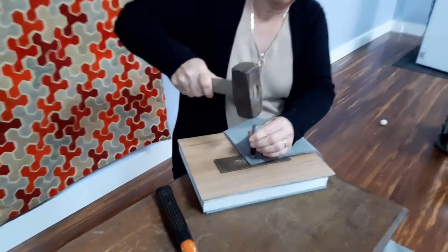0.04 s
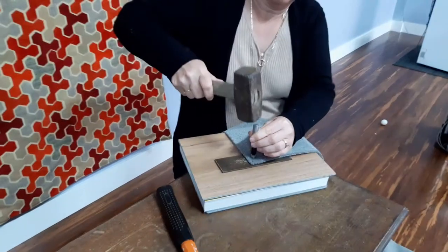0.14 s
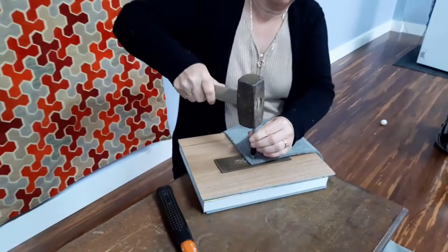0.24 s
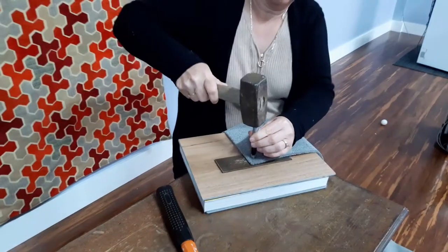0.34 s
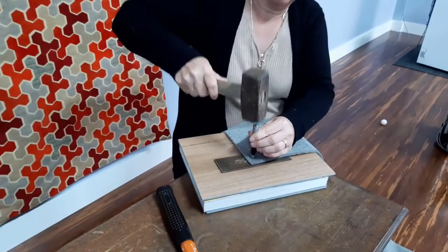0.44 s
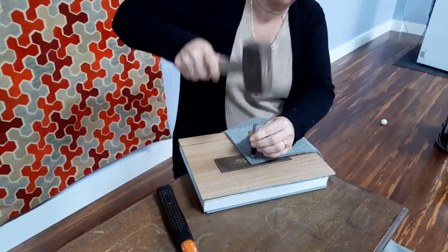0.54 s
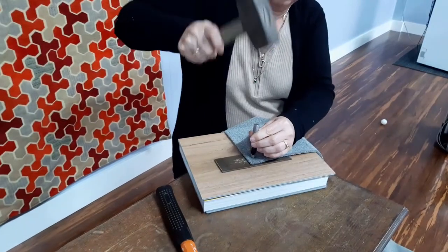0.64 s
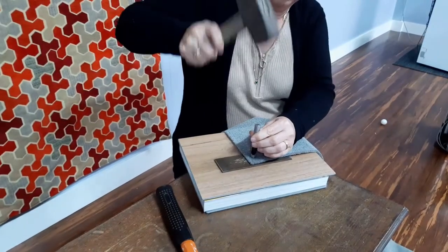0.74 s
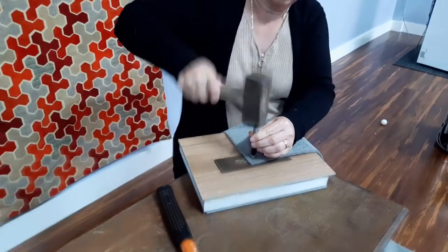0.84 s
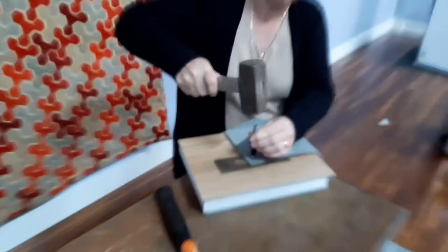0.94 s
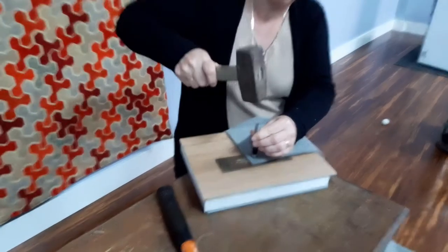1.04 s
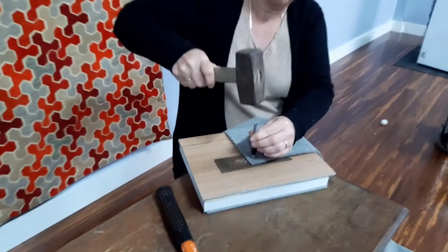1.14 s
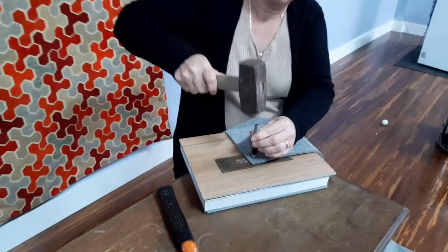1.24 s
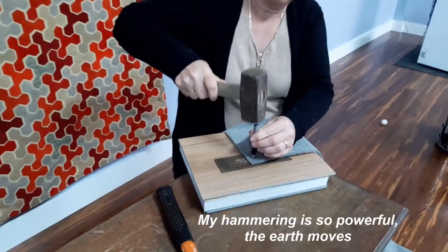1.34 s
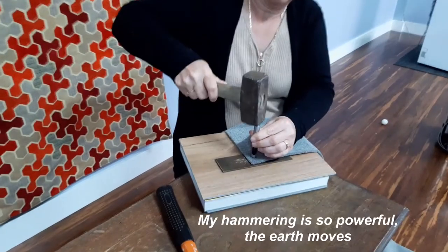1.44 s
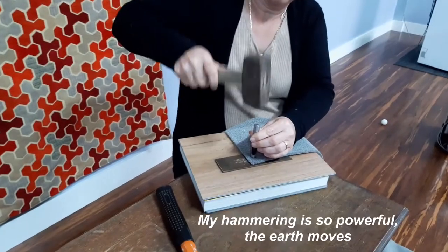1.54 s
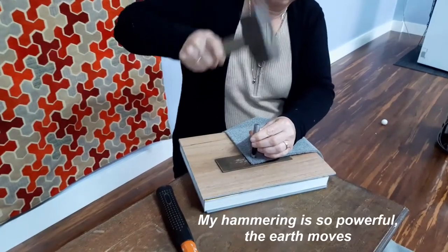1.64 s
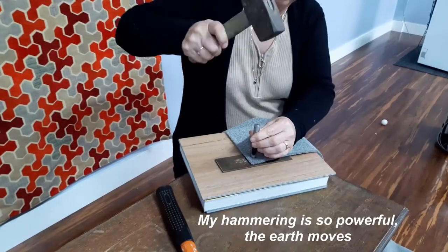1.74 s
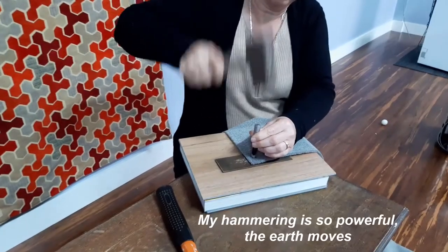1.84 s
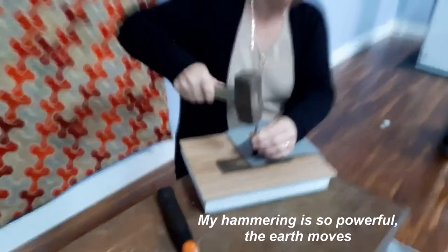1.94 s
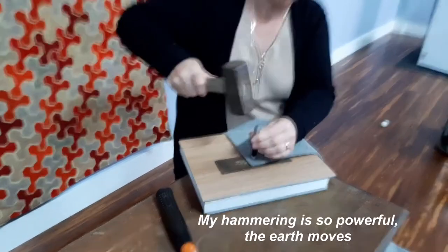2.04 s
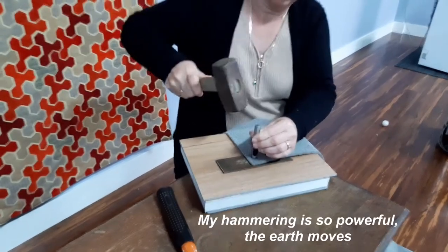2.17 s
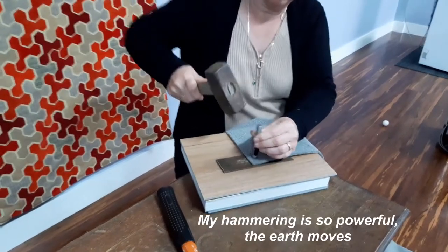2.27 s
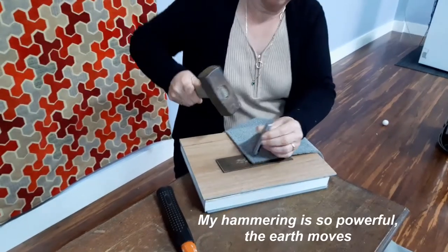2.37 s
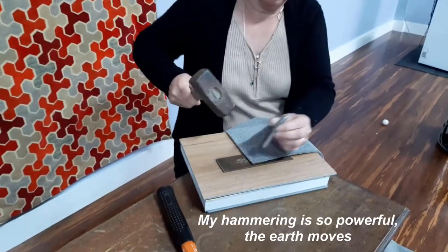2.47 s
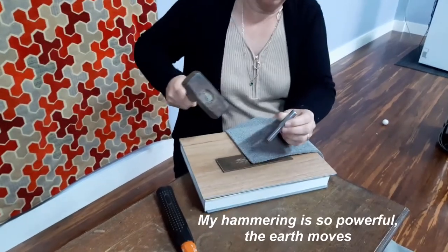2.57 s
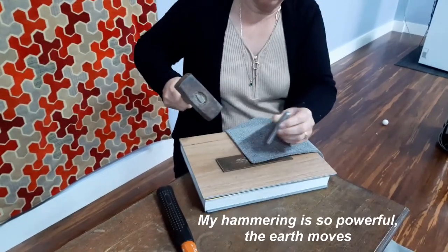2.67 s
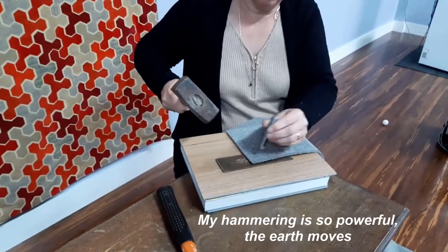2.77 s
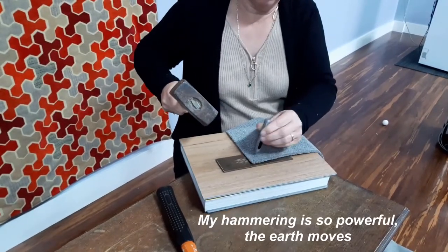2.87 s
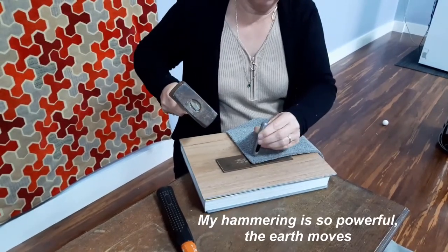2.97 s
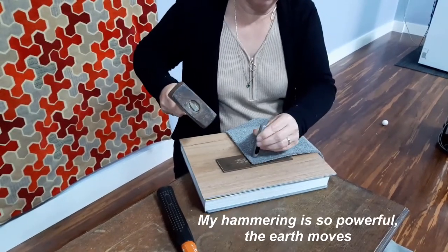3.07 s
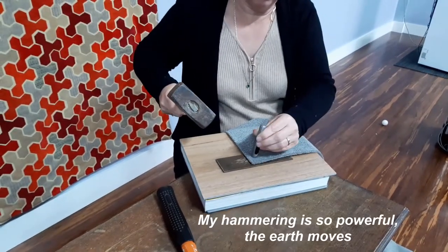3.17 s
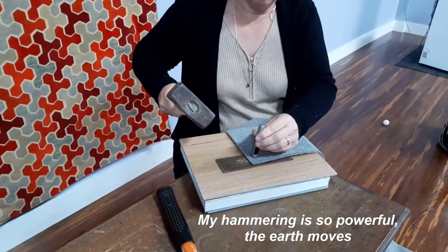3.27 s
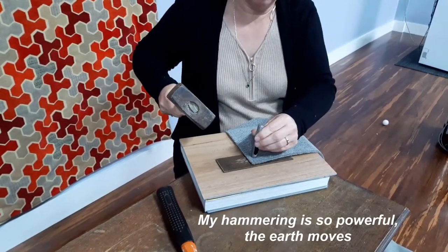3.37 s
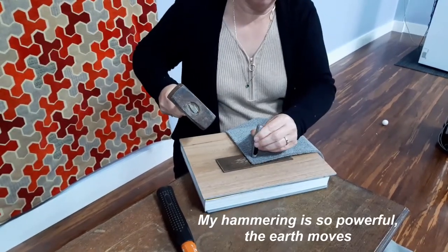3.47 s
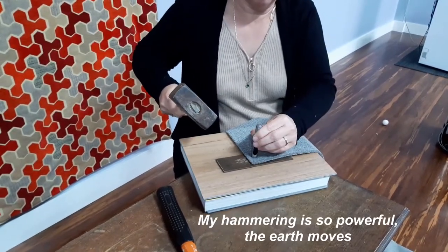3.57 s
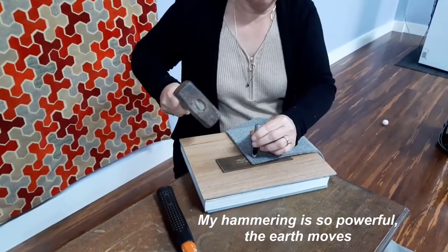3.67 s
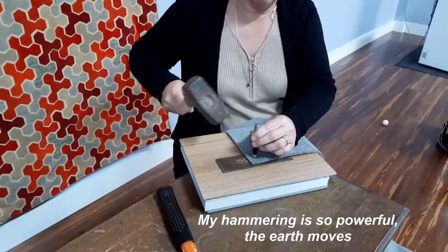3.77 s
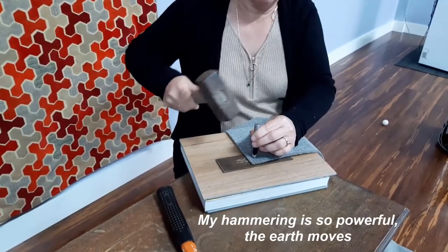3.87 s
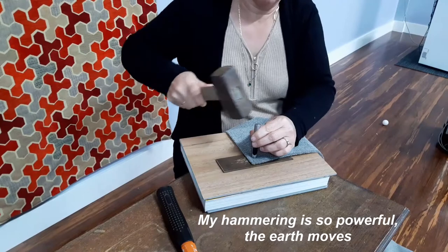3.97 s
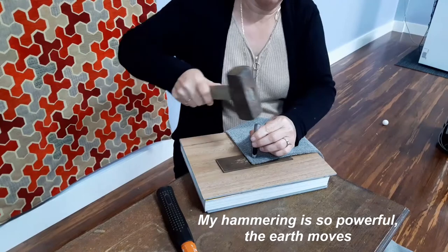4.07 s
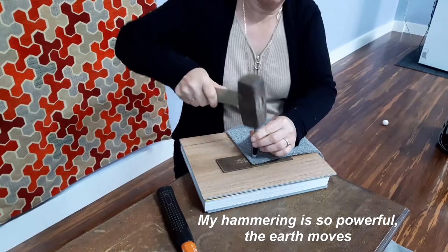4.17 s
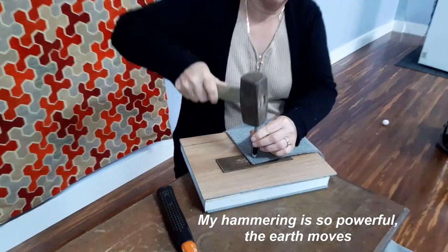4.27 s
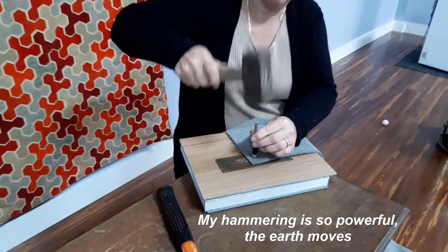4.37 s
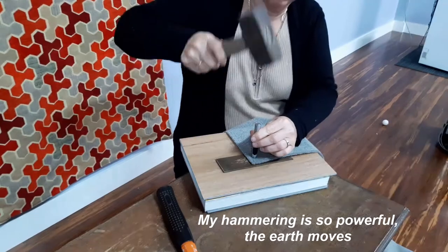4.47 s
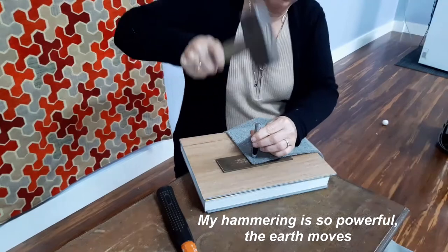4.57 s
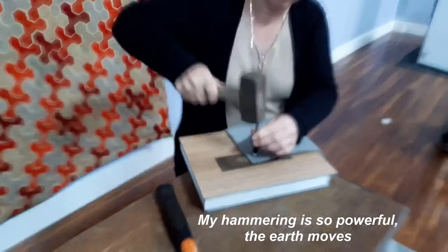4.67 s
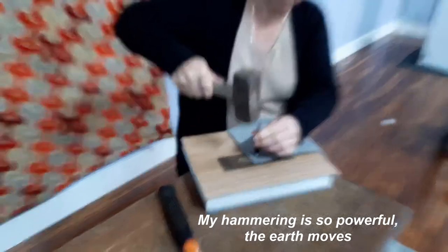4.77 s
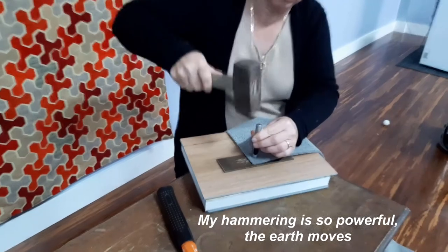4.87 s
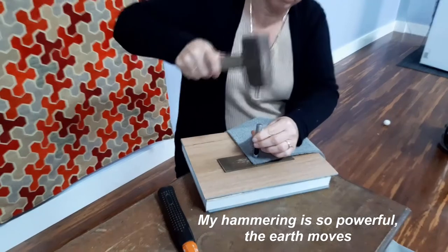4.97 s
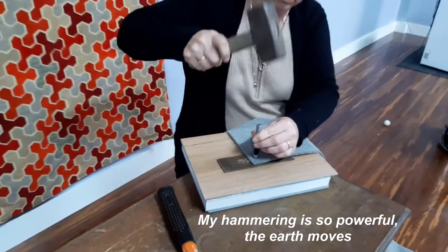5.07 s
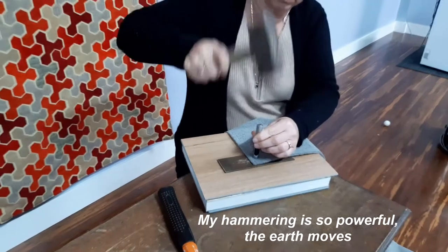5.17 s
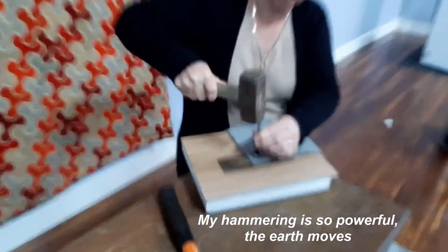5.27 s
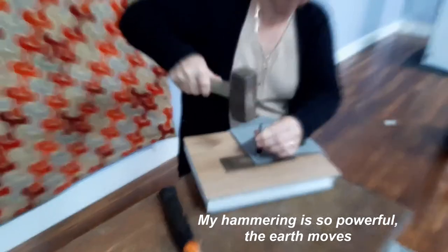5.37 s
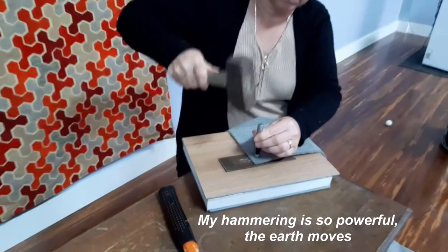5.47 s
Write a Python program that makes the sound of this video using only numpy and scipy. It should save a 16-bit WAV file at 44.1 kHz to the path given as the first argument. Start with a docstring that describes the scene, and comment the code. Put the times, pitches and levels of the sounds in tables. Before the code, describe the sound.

A heavy hammer drives a steel punch into fabric on a book on a desk. Two hard blows, each after a light aiming tap, land with a deep thud, a sharp crack and a thin, high ring. After a pause of about two seconds come a firmer tap and two more blows in quick succession. The microphone is near the desk, and the room's reverberation swells behind each hit.

```python
"""Hole punch and hammer on a desk

A heavy hammer drives a steel punch through thick fabric into a book, in a reverberant room.
Light aiming taps alternate with full blows: the desk thuds, the steel cracks and sings a thin high note.
The stereo microphone hears the desk directly, a little to the left; then the room swells up behind it.
Rumble, drone and hiss lie far below the blows, whose first peaks the recorder's fast limiter flattens."""
import sys
import numpy as np
from scipy import signal
from scipy.fft import rfft, irfft, next_fast_len
from scipy.io import wavfile
from scipy.ndimage import uniform_filter1d, minimum_filter1d

SR = 44100
rng = np.random.default_rng(int(sys.argv[2]) if len(sys.argv) > 2 else 0)


def int16_out(signal):
    """Quantize to a 16-bit WAV file."""
    q = np.round(np.clip(np.atleast_2d(signal).T, -1, 1) * 32767)
    wavfile.write(sys.argv[1], SR, q.astype(np.int16))


N = 243431

# resonances of desk, book and tools: (frequency [Hz], width [Hz], level [dB])
DESK_MODES = [(62, 25, 6.5), (105, 13, 12.5), (223, 61, 7.5), (287, 24, 11.5), (410, 32, -10),
              (552.4, 50, 4.5), (817, 32, -2), (1410, 120, -1.5), (2047, 88, 5), (5560, 320, 0.5),
              (6850, 120, -4)]
# the crack at the microphone, direct and off near surfaces: (delay [s], relative level [dB])
CRACK_ARRIVALS = [(0, 6.5), (0.002, 2), (0.012, -11)]


def amp(db):
    """Decibels to gain."""
    return 10 ** (np.asarray(db) / 20)


def unit(x):
    """Scaled to rms 1."""
    return x / np.sqrt(np.mean(x ** 2) + 1e-20)


def unit_energy(x):
    """Scaled to a mean energy of 1 per channel."""
    return unit(x) / np.sqrt(x.shape[-1])


def along(points, hz):
    """A curve through (frequency, value) points on a log frequency axis."""
    freqs, values = np.transpose(points)
    return np.interp(np.log(hz + 1), np.log(freqs + 1), values)


def filtered(x, response):
    """x through a zero-phase filter of gain response(hz)."""
    n = x.shape[-1]
    padded = next_fast_len(n + 8192)
    return irfft(rfft(x, padded) * response(np.fft.rfftfreq(padded, 1 / SR)), padded)[..., :n]


def minimum_phase(response, size=16384):
    """The minimum-phase impulse response of a gain curve."""
    cepstrum = irfft(np.log(response(np.fft.rfftfreq(size, 1 / SR)) + 1e-6))
    cepstrum[1:size // 2] *= 2
    cepstrum[size // 2 + 1:] = 0
    return irfft(np.exp(rfft(cepstrum)))[:size // 2]


def panned(x, left_db):
    """Louder in the left microphone by left_db."""
    return x * amp([[left_db / 2], [-left_db / 2]])


def diffuse(n):
    """Noise from all around: most alike at the two microphones in the upper bass, unrelated in the treble."""
    # (frequency [Hz], left-right correlation [-1..1])
    likeness = [(30, 0.45), (60, 0.14), (130, 0.95), (300, 0.93), (640, 0.31), (1300, 0), (15000, 0.0042)]
    angle = lambda hz: np.arccos(np.clip(along(likeness, hz), -1, 1)) / 2
    weights = lambda hz: np.array([np.cos(angle(hz)), np.sin(angle(hz))])
    mid, side = filtered(rng.standard_normal((2, n)), weights)
    return np.array([mid + side, mid - side])


def swell(rest_db, peak_s, peak_db, rise_db_per_s, fall_db_per_s):
    """A resting gain joined by one swell that rises and falls evenly in dB."""
    t = np.arange(N) / SR - peak_s
    return np.hypot(amp(rest_db), amp(peak_db + np.minimum(rise_db_per_s * t, -fall_db_per_s * t)))


def room_tone():
    """Low rumble, a dull drone and a faint whining hiss swell once, starting in the hammer's pause."""
    # spectra of the three noises: (frequency [Hz], relative density [dB])
    rumble = [(20, -6.5), (33, -8), (48, -0.5), (65, 1), (88, 6.5), (130, -2.5), (220, -20), (1000, -72)]
    drone = [(29, -34), (50, -10.5), (93, -14), (225, -11), (300, -6), (350, -14), (495, -16), (780, -16.5),
             (1600, -43.5), (2500, -37.5), (3090, -53), (4120, -45.5), (5000, -67.5), (6500, -86),
             (11000, -120)]
    hiss = [(300, 4), (1700, 0), (3000, 8.5), (5500, -0.5), (9000, -3.5), (13000, 2.5), (16000, 6.5)]
    # tones of the whine: (frequency [Hz], level against the hiss [dB])
    whine_tones = [(2460, -6), (2509, -14), (4032, -11)]
    t = np.arange(N) / SR
    rumble_gain = swell(rest_db=-69.5, peak_s=4.45, peak_db=-52, rise_db_per_s=20, fall_db_per_s=20)
    drone_gain = swell(rest_db=-70.5, peak_s=4.17, peak_db=-53, rise_db_per_s=13.5, fall_db_per_s=30.5)
    noise = lambda spectrum: unit(filtered(diffuse(N), lambda hz: amp(along(spectrum, hz))))
    whine = sum(amp(db) * unit(np.sin(2 * np.pi * hz * t)) for hz, db in whine_tones)
    return rumble_gain * noise(rumble) + drone_gain * (noise(drone) + amp(-23.5) * (noise(hiss) + whine))


def reverberation(t, build_s, dull_hz=11000):
    """The room's tail, duller than the direct sound, builds up and then dies soonest in the treble."""
    # the room's decay: (frequency [Hz], t60 [s])
    decay_times = [(60, 0.81), (120, 1.87), (230, 1.287), (450, 1.258), (1000, 1.522), (2200, 1.19),
                   (4000, 1.094), (7000, 0.87), (10000, 0.64), (15000, 0.49)]
    hz, seconds, spectra = signal.stft(diffuse(len(t)), SR, nperseg=512)
    fade = amp(-60 * seconds / along(decay_times, hz)[:, None])
    dullness = np.sqrt(1 + (hz[:, None] / dull_hz) ** 4)
    tail = signal.istft(spectra * fade / dullness, SR, nperseg=512)[1][:, :len(t)]
    return unit_energy(tail * (1 - np.exp(-(t / build_s) ** 2)))


def floor_shudder(t, hz=66, t60=0.1, rise_s=0.004):
    """The floor under the desk gives a short, deep shudder."""
    return amp(-60 * t / t60) * (1 - np.exp(-t / rise_s)) * np.sin(2 * np.pi * hz * t)


def desk_resonance(hz):
    """Desk, book and tools lift the strike's spectrum at each of their modes."""
    peaks = sum(amp(db) ** 2 / (1 + (2 * (hz - centre) / width) ** 2) for centre, width, db in DESK_MODES)
    return np.sqrt(1 + peaks)


def desk_knock(t, band_hz, rise_s, damping_hz):
    """The desk top's own modes, heard directly; the hand and the fabric damp them."""
    modes = sum(amp(db) * np.exp(-np.pi * (width + damping_hz) * t) * np.cos(2 * np.pi * hz * t)
                for hz, width, db in DESK_MODES)
    onset = 1 - np.exp(-t / rise_s)
    return -unit_energy(signal.lfilter(*signal.butter(2, band_hz, "band", fs=SR), modes * onset))


def steel_ring(t, spread_hz=5, paths=4, build_s=0.08):
    """Each steel note reaches each microphone by several paths that build up and beat slowly."""
    # ringing steel: (frequency [Hz], relative level [dB], t60 [s])
    notes = [(10659, 0, 1.25), (10045, -10, 1.1)]
    ring = np.zeros((2, len(t)))
    for hz, db, t60 in notes:
        detune = spread_hz * rng.standard_normal((paths, 2, 1))
        phase = rng.random((paths, 2, 1))
        ring += amp(db - 60 * t / t60) * unit(np.sin(2 * np.pi * ((hz + detune) * t + phase)).sum(0))
    return ring * (1 - np.exp(-t / build_s))


def contact(t, crack_db, arrivals, crack_t60, split_hz=190, scatter_db=-21, scatter_t60=0.15):
    """Hammer meets punch: one clean push in the bass, a scattered crack above it."""
    push = signal.lfilter(*signal.butter(2, split_hz, fs=SR), t == 0)
    bursts = sum((t >= delay) * amp(db - 60 * np.abs(t - delay) / crack_t60) for delay, db in arrivals)
    scatter = amp(scatter_db - 60 * t / scatter_t60)
    crack = unit_energy((bursts + scatter) * diffuse(len(t)))
    return amp(crack_db) * signal.lfilter(*signal.butter(2, split_hz, "high", fs=SR), crack) - push


def hammer(t, strikes, force, knock, arrivals, crack_t60, room_db, room_build_s, floor_db):
    """Every strike knocks the desk and rings the steel; room and floor answer in step with the thud."""
    lead = int(0.5 * SR)  # space for a strike before time zero
    body = unit_energy(minimum_phase(lambda hz: amp(along(force, hz)) * desk_resonance(hz)))
    track = np.zeros((2, lead + N + len(t)))
    for start_s, thud_db, crack_db, knock_db, ring_db in strikes:
        direct = contact(t, crack_db, arrivals, crack_t60)
        tail = amp(room_db) * reverberation(t, room_build_s)
        thud = signal.fftconvolve(direct + tail, body[None], axes=1)[:, :len(t)]
        thud += amp(knock_db) * panned(knock, left_db=3) + amp(floor_db) * floor_shudder(t)
        ring = panned(steel_ring(t), left_db=7)
        start = lead + round(start_s * SR)
        track[:, start:start + len(t)] += amp(thud_db) * thud + amp(ring_db) * ring
    return track[:, lead:lead + N]


def aiming_taps(t, echo_s=0.013, echo_db=0.5):
    """Light taps wake mostly the desk's main mode; a strong early echo doubles each tap's click."""
    # (time [s], thud [dB], crack within thud [dB], knock within thud [dB], steel ring [dB])
    taps = [(0.2528, -4.5, 5.5, 5, -59.5), (1.3998, 0, 5.5, 5, -62), (4.1885, 14.5, 1, 4.5, -61.5)]
    # spectrum of a tap's force: (frequency [Hz], relative level [dB])
    force = [(25, -36.5), (60, -19.5), (130, -17.5), (230, -5.5), (400, -0.5), (850, -5), (1400, -19),
             (2000, -25), (3000, -11), (4000, -9.5), (5400, -28.5), (8200, -25), (11000, -34), (15500, -37)]
    knock = desk_knock(t, band_hz=(255, 470), rise_s=0.0025, damping_hz=5)
    arrivals = CRACK_ARRIVALS + [(echo_s, echo_db)]
    return hammer(t, taps, force, knock, arrivals,
                  crack_t60=0.02, room_db=-3, room_build_s=0.0086, floor_db=-56)


def full_blows(t):
    """Full blows knock the desk sharply and shake the floor; the room swells up behind each."""
    # (time [s], thud [dB], crack within thud [dB], knock within thud [dB], steel ring [dB])
    blows = [(-0.2, 20.5, 6, -3.5, -54), (0.8508, 19.5, 8, -3.5, -49), (1.8903, 19.5, 3, -5, -43),
             (4.656, 20, 7.5, 0, -47), (5.2412, 18.5, 11, -5.5, -51)]
    # spectrum of a blow's force: (frequency [Hz], relative level [dB])
    force = [(25, -39.5), (60, -27), (130, -15), (200, -0.5), (400, 0.5), (850, -2), (1500, -12),
             (2700, -14.5), (4500, -18.5), (6500, -15.5), (9000, -20.5), (15500, -20)]
    knock = desk_knock(t, band_hz=(170, 650), rise_s=0.00025, damping_hz=8.6)
    return hammer(t, blows, force, knock, CRACK_ARRIVALS,
                  crack_t60=0.014, room_db=0.08, room_build_s=0.042, floor_db=-41)


def scene():
    """Blows and taps over the room tone, as they reach the microphone."""
    since_strike = np.arange(int(1.7 * SR)) / SR
    return panned(full_blows(since_strike) + aiming_taps(since_strike) + room_tone(), left_db=0.5)


def limiter(x, ceiling_db, release_db_per_s, window=31):
    """Peaks pull the gain down just ahead of them; it climbs back quickly."""
    needed_db = np.minimum(ceiling_db - 20 * np.log10(np.abs(x).max(0) + 1e-9), 0)
    climb_db = release_db_per_s * np.arange(N) / SR
    gain_db = np.minimum.accumulate(minimum_filter1d(needed_db, window) - climb_db) + climb_db
    return x * amp(uniform_filter1d(gain_db, window))


def record(dry):
    """The recorder limits the peaks and cuts off steeply near 16 kHz."""
    limited = limiter(dry, ceiling_db=-1, release_db_per_s=900)
    return filtered(limited, lambda hz: 1 / np.sqrt(1 + (hz / 15950) ** 160))


dry = scene()
out = record(dry)
int16_out(out)
```